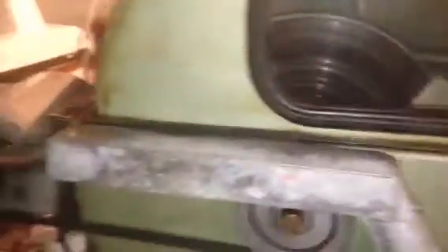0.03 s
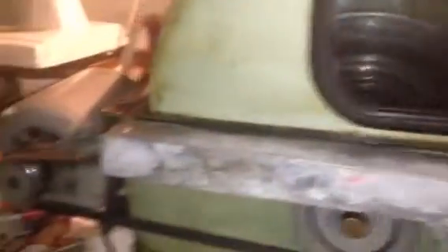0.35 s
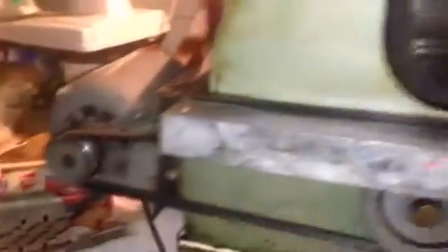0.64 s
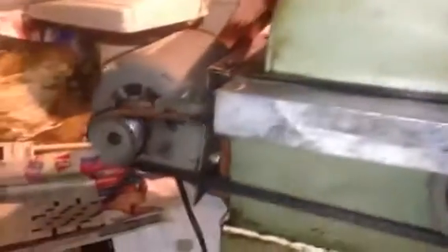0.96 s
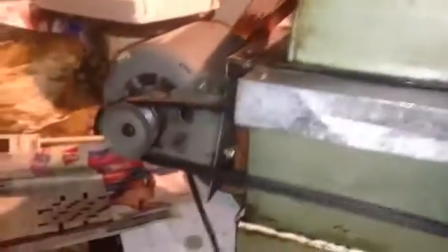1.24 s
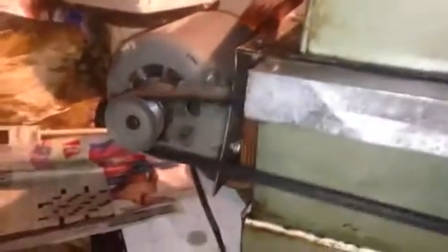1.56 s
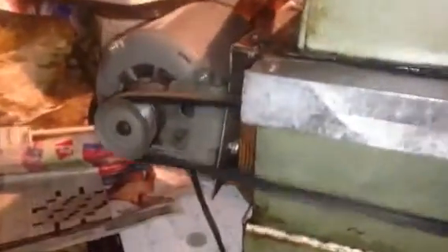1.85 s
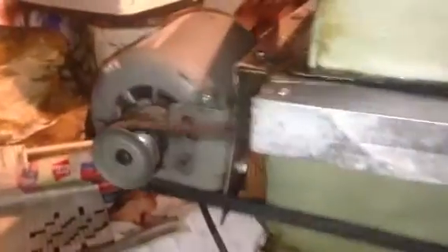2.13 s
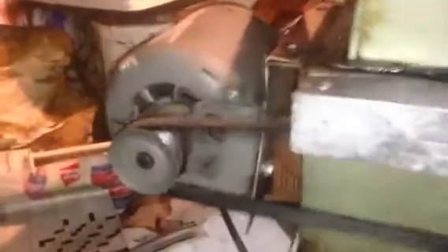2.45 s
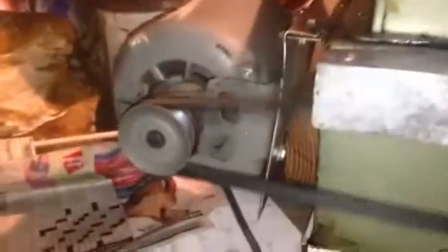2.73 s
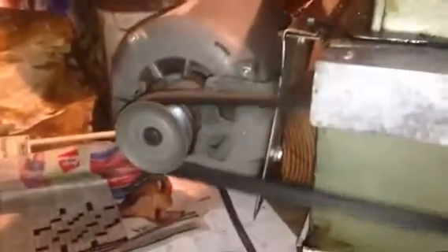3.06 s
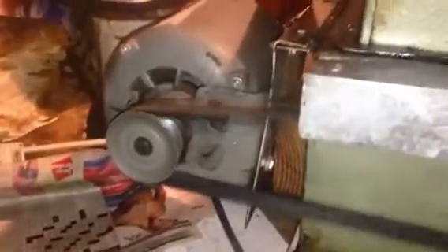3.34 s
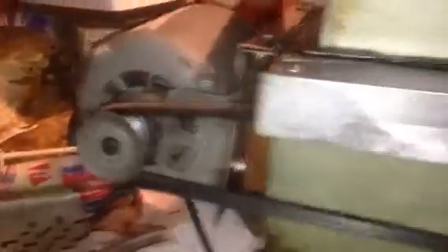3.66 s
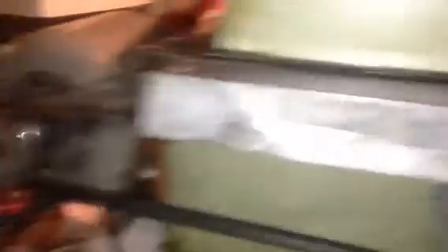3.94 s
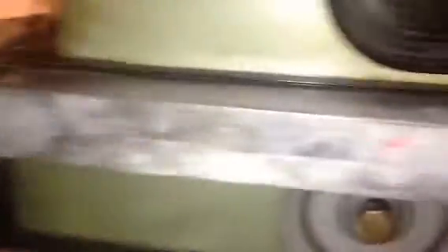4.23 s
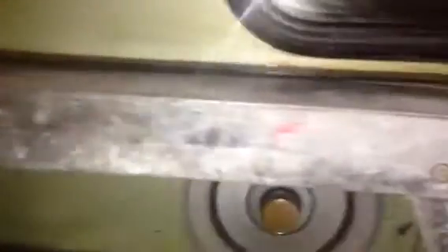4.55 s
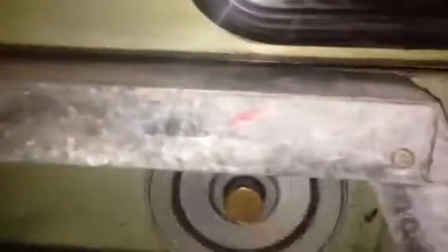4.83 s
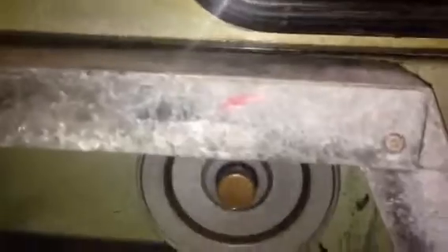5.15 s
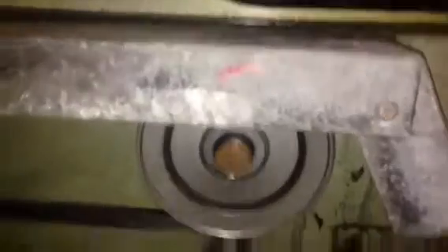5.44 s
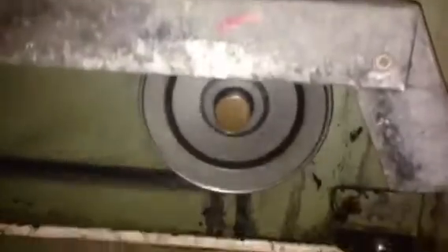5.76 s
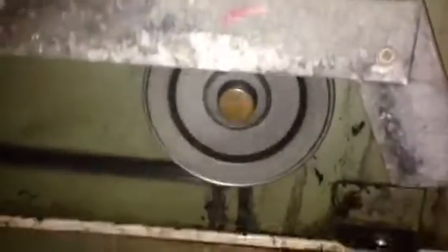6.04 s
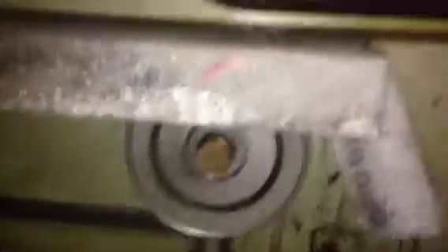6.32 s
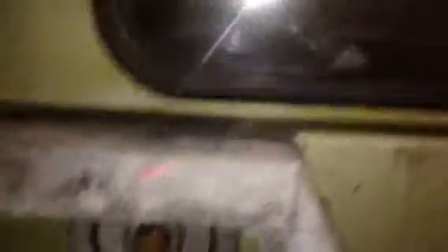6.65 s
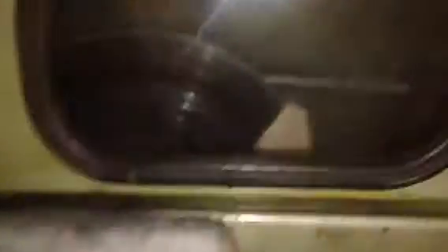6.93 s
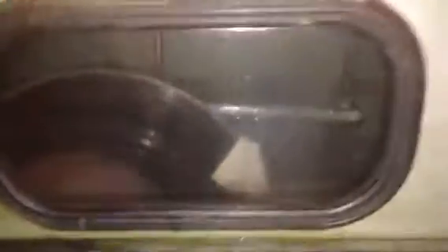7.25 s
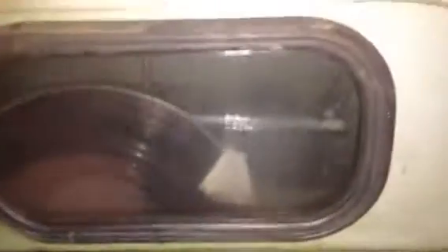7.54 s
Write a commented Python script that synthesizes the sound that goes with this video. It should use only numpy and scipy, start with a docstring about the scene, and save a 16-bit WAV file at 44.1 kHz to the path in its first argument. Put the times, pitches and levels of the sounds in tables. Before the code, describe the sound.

A belt-driven rock saw runs steadily, its motor humming and throbbing under pulsing grinding hiss, metallic chatter and faint ticks.

```python
"""A belt-driven rock saw in a workshop, close up, the microphone moving from motor to pulley to hood.
The motor whines, hums at twice the mains frequency and throbs with each lap of the drive belt,
which rumbles and now and then ticks. The blade chatters against the stone, hardest once a turn,
ringing near 1.9 kHz. Loose panels buzz; under the hood air rushes and the grinding hisses in pulses."""
import sys
import numpy as np
from scipy import signal
from scipy.fft import rfft, irfft, next_fast_len
from scipy.io import wavfile
from scipy.ndimage import map_coordinates

SR = 44100
rng = np.random.default_rng(int(sys.argv[2]) if len(sys.argv) > 2 else 0)


def output_pcm(signal):
    """Save a mono or channel-first signal as 16-bit PCM at the path in sys.argv[1].

    Samples are clipped to [-1, 1] before scaling.
    """
    pcm = np.clip(np.atleast_2d(signal).T, -1, 1) * 32767
    wavfile.write(sys.argv[1], SR, np.round(pcm).astype(np.int16))


N = 334719

MAINS_HZ, BELT_HZ, BLADE_HZ = 59.99, 4.97, 14.602


def amp(db):
    """Decibels to gain."""
    return 10 ** (np.asarray(db) / 20)


def unit(x):
    """Scaled to rms 1."""
    return x / np.sqrt(np.mean(x ** 2) + 1e-20)


def noise():
    """White noise."""
    return rng.standard_normal(N)


def wobble(rate):
    """A smooth random curve, rate knots a second."""
    knots = rng.standard_normal(int(N * rate / SR) + 4)
    return map_coordinates(knots, [np.arange(N) * rate / SR])


def swing(cycles, peak_at):
    """A smooth rise and fall between -1 and 1, once a revolution."""
    return np.cos(2 * np.pi * (cycles - peak_at))


def swells(rows, width_s):
    """A dB curve with a brief bump for each row of time_s, boost_db."""
    t = np.arange(N) / SR
    return sum(db * np.clip(1 - ((t - s) / width_s) ** 2, 0, 1) for s, db in rows)


def filtered(x, response):
    """x times a complex response of frequency."""
    size = next_fast_len(N + SR // 2)
    return irfft(rfft(x, size) * response(np.fft.rfftfreq(size, 1 / SR)), size)[:N]


def coloured(x, points):
    """x through a spectrum of freq_hz, level_db points, at rms 1."""
    f, db = np.transpose(points)
    return unit(filtered(x, lambda hz: amp(np.interp(np.log(hz + 1), np.log(f), db))))


def resonances(modes):
    """The frequency response of damped modes, alternating in sign."""
    return lambda hz: sum(
        (-1) ** k * amp(db) * 1j * hz * width / (pitch ** 2 - hz ** 2 + 1j * hz * width)
        for k, (pitch, width, db) in enumerate(modes))


def heard(at_motor, pulley, hood):
    """A value at the moving microphone: that at the motor, plus what pulley and hood add up close."""
    # the microphone's walk along the saw: time_s, near_pulley (0-1), near_hood (0-1)
    mic_path = [(0, 0, 0.3), (.8, 0.03, 0.04), (3.9, 0.01, 0), (4.6, 0.8, 0.5), (5.4, 0.88, 0),
                (6.2, 0.82, 0.07), (7, 0.43, 0.58), (7.59, 0, 1)]
    time_s, near_pulley, near_hood = np.transpose(mic_path)
    return np.interp(np.arange(N) / SR, time_s, at_motor + pulley * near_pulley + hood * near_hood)


def tugs(laps, width_s=0.0095):
    """Swells in dB of the hum and of the grinding as the belt's stiff spots pass the pulley."""
    # stiff spots along the belt: lap_share, hum_db, grind_db
    stiff_spots = [(.06, 4.5, 3), (.31, 3, 4.5), (.51, 1.3, 1.7), (.785, -1, 6.6), (.9, 4.5, 5)]
    load_db = press_db = 0
    for at, hum_db, grind_db in stiff_spots:
        away_s = ((laps - at + .5) % 1 - .5) / BELT_HZ
        tug = np.exp(-.5 * (away_s / width_s) ** 2)
        load_db += hum_db * tug
        press_db += grind_db * tug
    return load_db - load_db.mean(), press_db - press_db.mean()


def hum(clock, sway=0.11, overtone_db=-24.5):
    """Magnetic hum of the motor; belt tension swells it and pulls on its phase."""
    load_db, _ = tugs(clock * BELT_HZ)
    phase = 2 * np.pi * 2 * MAINS_HZ * clock + sway * load_db
    tone = np.sin(phase) + amp(overtone_db) * np.sin(3 * phase)
    throb = unit(amp(load_db + 0.23 * wobble(4.4)) * tone)
    return filtered(throb, lambda hz: 1 / (1 + (hz / 600) ** 4))


def whine(turns, slots=36, drift_rad=1.5, flutter_db=6.0):
    """The motor runs at twice the blade's speed, and its passing slots sing unsteadily."""
    phase = 2 * np.pi * 2 * slots * turns + drift_rad * wobble(35)
    return unit(amp(flutter_db * wobble(25.05)) * np.sin(phase))


def flap(laps):
    """The belt flaps once a lap: a swing in dB that shakes the saw."""
    return 0.85 * swing(laps, peak_at=.52)


def bite(turns, start=0.77, rise=.2, depth_db=8.5):
    """Force in dB as the blade's high side bites fast and lets go slowly; times are shares of a turn."""
    since = (turns - start) % 1
    return depth_db * (np.minimum(since / rise, (1 - since) / (1 - rise)) - .5)


def belt(laps, turns, slip=0.89, frame_db=-2):
    """The same bumps of the belt cross the pulleys on every lap; they and random slip shake the frame."""
    # the belt's rumble: freq_hz, level_db
    rumble_spectrum = [(20, -26), (35, -22), (50, -16.5), (75, -1.5), (100, 2), (150, 0), (180, -6),
                       (240, -8.5), (420, -9), (560, -19.5), (900, -28), (2000, -44)]
    # modes of the frame: pitch_hz, width_hz, level_db
    frame_modes = [(272.8, 6, -5.5), (358, 10.3, 7.5), (372.5, 20.6, -3), (456.5, 19.5, -6.5),
                   (541.6, 31, -12)]
    # the frame booms: time_s, boost_db
    booms = [(.48, 5), (.9, 4.5), (1.54, 4.5), (2.145, 3.5), (3.89, 5), (4.07, 4)]
    size = 2048
    bumps = irfft(np.exp(2j * np.pi * rng.random(size // 2 + 1)))
    creep = 0.0016 * wobble(7)
    track = unit(map_coordinates(bumps, [(laps + creep) % 1 * size], mode="grid-wrap"))
    shake = (track + noise()) * amp(0.61 * wobble(8.2) - 0.22 * bite(turns))
    frame = filtered(shake, resonances(frame_modes))
    frame *= amp(1.85 * flap(laps) + swells(booms, width_s=0.054))
    rumble = coloured((track + slip * noise()) * amp(flap(laps)), rumble_spectrum)
    return rumble + amp(frame_db) * unit(frame)


def rattle(turns, laps, uneven_db=3.5, buzz_db=-3):
    """Loose sheet-metal panels buzz in short spurts, each alone and all together."""
    # modes of the panels: pitch_hz, width_hz, level_db
    panel_modes = [(682, 100, -3), (1059, 87, -2.5), (1188, 51, -6), (1362, 43, 2), (1486, 76, -1),
                   (1662, 72, -2)]
    # louder rattles: time_s, boost_db
    jolts = [(1.983, 5), (3.873, 7.5), (5.263, 1), (6.572, 4), (7.372, 5.5)]
    shake_db = 1.06 * flap(laps) + 0.2 * bite(turns) + 0.95 * wobble(40) + swells(jolts, width_s=0.011)
    spurts = lambda: unit(noise() * amp(shake_db + uneven_db * wobble(45)))
    alone = unit(sum(filtered(spurts(), resonances([mode])) for mode in panel_modes))
    together = unit(filtered(spurts(), resonances(panel_modes)))
    return unit(filtered(alone + amp(buzz_db) * together, lambda hz: 1 / (1 + (hz / 2100) ** 8)))


def blows(beats, level_db, jitter_s):
    """One impulse each time beats passes a whole number, a little early or late; rms 1."""
    at = np.flatnonzero(np.diff(np.floor(beats)) > 0)
    late = np.round(jitter_s * SR * rng.standard_normal(len(at))).astype(int)
    return unit(np.bincount(np.clip(at + late, 0, N - 1), amp(level_db[at]), N))


def blade(turns, laps, rub_db=2.5, uneven_db=3.5, skirt_hz=295):
    """The rim knocks five times a turn and rubs in between, ringing the steel disc."""
    # modes of the disc: pitch_hz, width_hz, level_db
    disc_modes = [(1853, 61, -17), (1896.4, 56.6, 0), (2004, 50, -2), (2066, 82, -6)]
    # the blade catches harder in the cut: time_s, boost_db
    catches = [(.355, 7), (3.135, 3), (3.338, 5), (5.258, 4.5), (6.356, 7), (7.058, 6)]
    force_db = bite(turns) + flap(laps) + .5 * wobble(14) + swells(catches, width_s=0.019)
    knocks = blows(5 * turns + .3, force_db + uneven_db * wobble(70), jitter_s=0.000798)
    rub = unit(noise() * amp(force_db))
    ring = filtered(knocks + amp(rub_db) * rub, resonances(disc_modes))
    return unit(filtered(ring, lambda hz: 1 / (1 + ((hz - 1950) / skirt_hz) ** 4)))


def whirr(turns, hood_db=-7.0):
    """Fan air and spray rush steadily and sound the hood."""
    # the rush of air and spray: freq_hz, level_db
    air_spectrum = [(300, 1), (800, -11), (2000, -0.5), (3500, 1), (4500, 1), (6000, -1), (7000, 2.5),
                    (9000, -0.5), (12000, -13), (15000, -4.5)]
    # modes of the hood: pitch_hz, width_hz, level_db
    hood_modes = [(2700, 33, -12), (3385, 88, 9.5), (3690, 114, -4.5), (4904, 89, 6.5), (6340, 97, -29),
                  (6890, 49, 4)]
    air = noise() * amp(0.31 * bite(turns + 0.13) + 0.9 * wobble(30))
    hood = unit(filtered(air * amp(1.4 * wobble(20)), resonances(hood_modes)))
    return coloured(air, air_spectrum) + amp(hood_db) * hood


def grinding(turns, laps, grit_db=1.2, top_hz=11200, brighten=0.24):
    """Diamond grit hisses on the stone, pressed on by the eccentric blade's turn and the belt's tug."""
    # the hiss of the grit: freq_hz, level_db
    grit_spectrum = [(2500, -29), (5900, -10), (6600, -3.5), (7900, -4.5), (9200, -1), (9900, 2),
                     (11300, 0.5), (12600, 0), (13500, -1), (15300, -4.5)]
    top_db = heard(-1.3, pulley=3.9, hood=4)
    tug_db = heard(0.56, pulley=0.57, hood=.72) * tugs(laps)[1]
    press_db = tug_db + 2.5 * swing(turns, peak_at=1)
    hiss = coloured(noise() * amp(press_db + 0.3 * wobble(25) + grit_db * wobble(1500)), grit_spectrum)
    top = filtered(hiss, lambda hz: 1 / (1 + (top_hz / (hz + 1)) ** 12))
    # a harder tug makes the hiss brighter as well as louder
    bright_db = top_db + brighten * tug_db
    return (hiss + (amp(bright_db) - 1) * top) * amp(-top_db / 2)


def reflections(x, echo_db=-16.5, spread_s=.007, count=8):
    """Near metal faces echo x; their paths drift as the microphone moves."""
    delays = [spread_s * SR * rng.uniform(0.1496, 1) + 3 * wobble(1.2) for _ in range(count)]
    oversampled = signal.resample_poly(x, 2, 1)
    echoes = sum(np.interp(2 * (np.arange(N) - delay), np.arange(2 * N), oversampled) for delay in delays)
    return (x + amp(echo_db) * echoes) / np.sqrt(1 + count * amp(echo_db) ** 2)


def ticks(centre_hz=3040, width_hz=1600, t60_s=.07):
    """The belt's joint flicks a pulley: a dry tick with a brief ring."""
    # flicks of the joint: start_s, level_db
    flicks = [(0.3107, -23), (0.6993, -25.5), (1.9046, -24), (2.0834, -19.5), (2.2847, -22), (2.9, -17),
              (3.1014, -20.5), (3.33, -25), (4.8993, -20), (5.7169, -24), (6.3355, -28)]
    t = np.arange(N) / SR
    envelope = sum((t >= s) * amp(db - 60 * np.abs(t - s) / t60_s) for s, db in flicks)
    pulley = resonances([(centre_hz, width_hz, 0)])
    return envelope * unit(filtered(noise(), lambda hz: pulley(hz) ** 2))


def scene(audio_skip_at_s=2.05, audio_skip_s=.023):
    t = np.arange(N) / SR
    clock = t + audio_skip_s * (t > audio_skip_at_s)
    laps, turns = clock * BELT_HZ, clock * BLADE_HZ
    motor = amp(heard(-23.5, pulley=0.6, hood=1)) * hum(clock)
    motor += amp(heard(-45.5, pulley=-7, hood=-5)) * whine(turns)
    drive = amp(heard(-31, pulley=1.4, hood=-0.1)) * belt(laps, turns)
    drive += amp(-3.0) * ticks()
    metal = amp(heard(-36, pulley=2, hood=0.3)) * rattle(turns, laps)
    metal += amp(heard(-28, pulley=5, hood=-4.5)) * blade(turns, laps)
    rush = amp(heard(-30.5, pulley=-0.83, hood=.5)) * whirr(turns)
    rush += amp(heard(-27, pulley=-1.7, hood=1.9)) * grinding(turns, laps)
    return (motor + drive + metal + reflections(rush))[None]


def record(dry, low_hz=36, top_hz=15380):
    """The small microphone loses the deepest bass and keeps nothing above its band limit."""
    return filtered(dry[0], lambda hz: (hz < top_hz) / (1 + (low_hz / (hz + 1)) ** 6))[None]


dry = scene()
out = record(dry)
output_pcm(out)
```